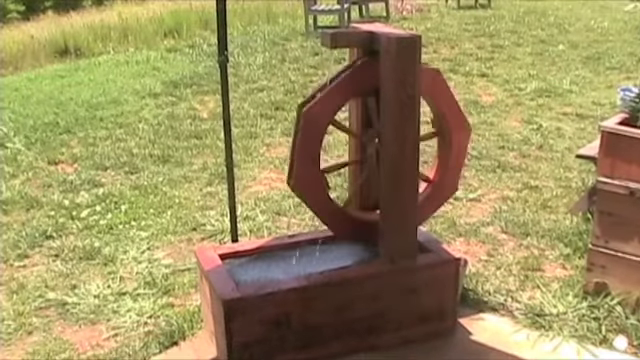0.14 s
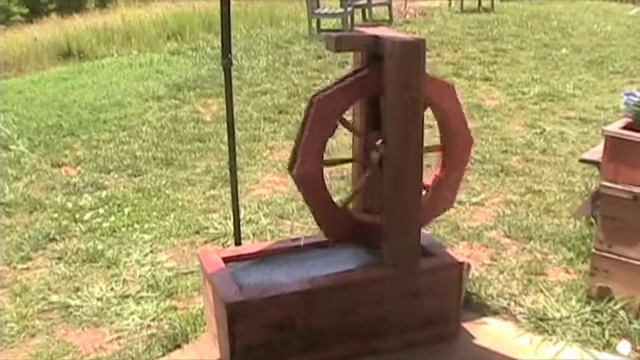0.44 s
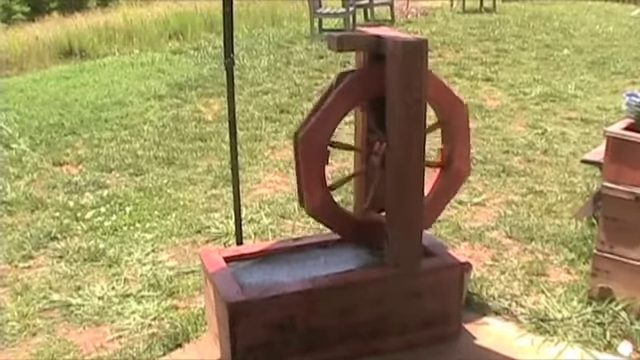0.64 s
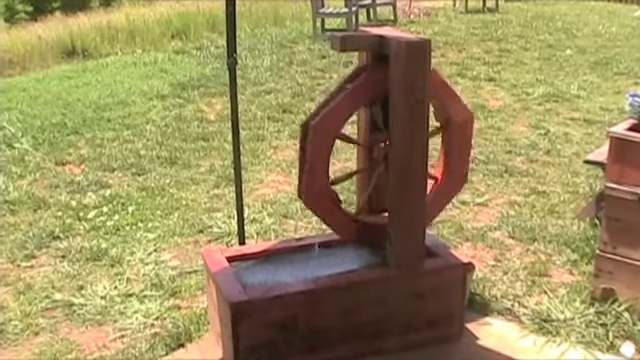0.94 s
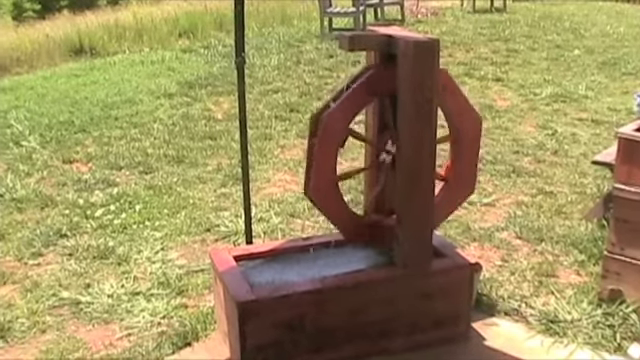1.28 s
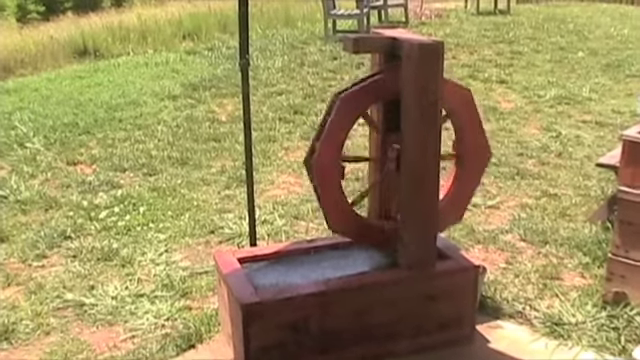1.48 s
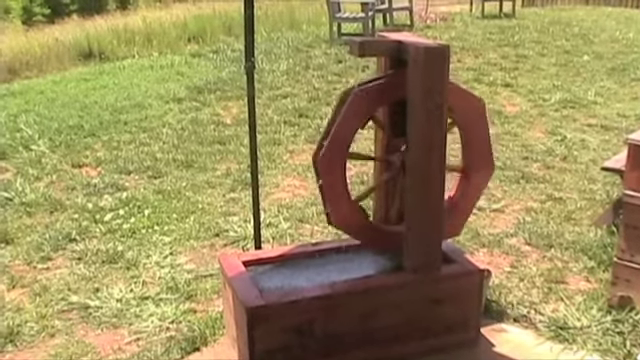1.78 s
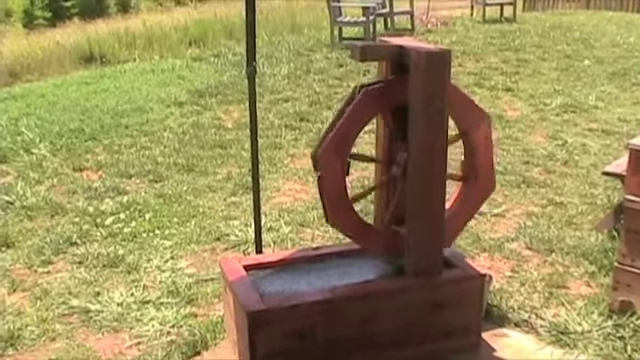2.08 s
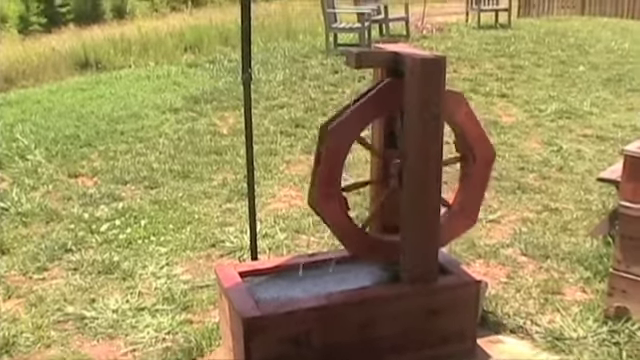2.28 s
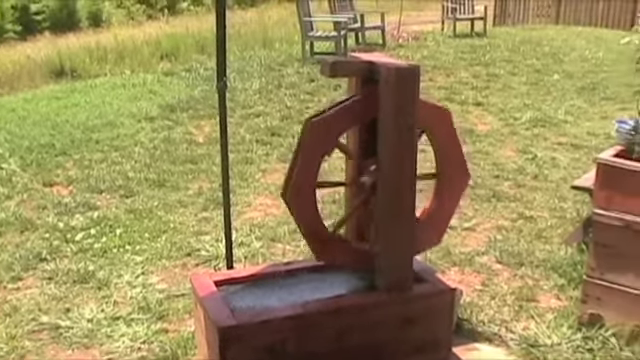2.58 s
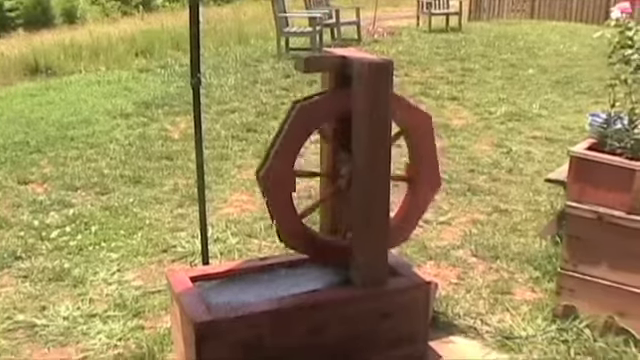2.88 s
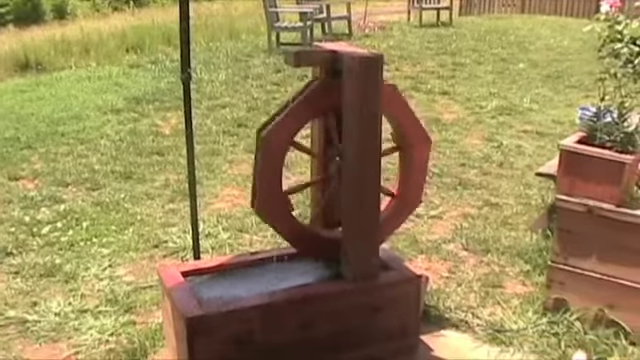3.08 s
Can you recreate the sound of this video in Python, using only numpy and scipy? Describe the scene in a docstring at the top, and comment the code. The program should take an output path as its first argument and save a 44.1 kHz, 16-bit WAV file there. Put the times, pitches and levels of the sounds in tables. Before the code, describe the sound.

Small wooden water wheel drips and splashes steadily into its trough outdoors, with a low motor hum

```python
"""In a garden, a small wooden water wheel: each paddle tips a splash of drops into the trough.
The splashes and a steady trickle are tiny rising bubbles over fine spray; louder drops are fluttering tones.
Wood knocks once and rebounds twice, as decaying modes. A pump motor hums in sines inside a low noise rush.
Wind buffets the two microphone ports in opposite phase as band noise and pops, then drops."""
import sys
import numpy as np
from scipy import signal
from scipy.fft import rfft, irfft, next_fast_len
from scipy.io import wavfile
from scipy.ndimage import uniform_filter1d

SR = 44100
rng = np.random.default_rng(int(sys.argv[2]) if len(sys.argv) > 2 else 0)


def generate_wav(signal):
    """Clip the signal to [-1, 1] and save it as 16-bit WAV at the path in sys.argv[1]."""
    frames = np.transpose(np.atleast_2d(signal))
    scaled = np.clip(frames, -1, 1) * 32767
    pcm = np.round(scaled).astype(np.int16)
    wavfile.write(sys.argv[1], SR, pcm)


N = 142443  # length in samples
NARROW_S = 2.1  # from here the low left-right sound is narrower

# Colour of the rush's left-right part before the narrowing. Each row: frequency in Hz, relative level in dB per Hz.
WIDE_COLOUR = [(100, -15), (256, -6.5), (500, -9.5), (800, -10.5), (1220, -13.5), (2140, -22), (5000, -27),
               (9000, -44), (12500, -30), (14500, -52)]
# The same part after the narrowing. Each row: frequency in Hz, relative level in dB per Hz.
NARROWED_COLOUR = [(100, -15), (270, -32), (500, -24), (900, -19.5), (1300, -18.5), (2140, -24),
                   (5000, -27), (9000, -46), (12500, -33), (14500, -48)]


def amp(db):
    """Gain for a level in dB."""
    return 10 ** (np.asarray(db, float) / 20)


def evened(x):
    """Scales to rms 1."""
    return x / np.sqrt(np.mean(x ** 2) + 1e-20)


def read(points, hz):
    """Reads a spectrum on a log-frequency axis."""
    point_hz, value = np.transpose(points)
    return np.interp(np.log(hz + 1), np.log(point_hz + 1), value)


def add(mix, start_s, sound):
    """Mixes a sound in at its start time."""
    part = mix[round(start_s * SR):][:len(sound)]
    part += sound[:len(part)]


def noise(colour_db, patchy_db, size):
    """Noise of rms 1 from random short-time spectra with drifting patches; colour_db(hz, t) shapes it."""
    frames = 4 * N // size + 5
    hz = np.fft.rfftfreq(size, 1 / SR)[:, None]
    real, imag, patch = rng.standard_normal((frames, len(hz), 3)).T
    patch = uniform_filter1d(patch, size=6, axis=0)  # across frequency
    patch = evened(uniform_filter1d(patch, size=8, axis=1))  # across time
    t = np.arange(frames) * size / 4 / SR
    spectra = (real + 1j * imag) * amp(colour_db(hz, t) + patchy_db * patch)
    return evened(signal.istft(spectra, nperseg=size, noverlap=3 * size // 4)[1][:N])


def slow(rate_hz):
    """Slow random drift of rms 1."""
    hz = np.fft.rfftfreq(N, 1 / SR)
    return evened(irfft(rfft(rng.standard_normal(N)) / (1 + (hz / rate_hz) ** 2), N))


def low_cut(x):
    """Steep 90 Hz high-pass that rings briefly on a blow."""
    return signal.sosfilt(signal.cheby1(3, 2, 90, "high", fs=SR, output="sos"), x)


def rush():
    """Broad low noise as centre and left-right parts; its bass eases off and narrows suddenly."""
    # Colour of the centre. Each row: frequency in Hz, relative level in dB per Hz.
    centre_colour = [(18, -50), (30, -9.5), (91, -8.5), (166, -8.5), (234, 0), (426, 1), (475, 1),
                     (654, -4.5), (777, -3.5), (1220, -7), (1330, -8), (1680, -9.5), (5000, -25.5),
                     (6500, -27.5), (11000, -120)]
    # Course of the centre; the first level sets the overall rms, the others count relative to it.
    # Each row: time in seconds, level in dB, extra bass in dB.
    level_course = [(0, -35.5, 1.5), (.8, -37, 1.4), (1.2, -36, 2.5), (1.5, -36, -0.2), (1.95, -36, 2),
                    (2.2, -37.5, -4), (2.4, -37, -1.5), (3.23, -35.5, -5)]
    bass_top_hz, wide_db, lean_left = 554, -46.5, 0.067
    s, level_db, bass_db = np.transpose(level_course)

    def centre_db(hz, t):
        bass = np.interp(t, s, bass_db) / (1 + (hz / bass_top_hz) ** 4)
        return read(centre_colour, hz) + bass + np.interp(t, s, level_db - level_db[0])

    def side_db(hz, t):
        return np.where(t < NARROW_S, read(WIDE_COLOUR, hz), read(NARROWED_COLOUR, hz))

    centre = amp(level_db[0]) * noise(centre_db, patchy_db=1.0, size=2048)
    side = amp(wide_db) * noise(side_db, patchy_db=0.0, size=1024)
    before = np.arange(N) < NARROW_S * SR  # the lean ends at the narrowing
    return np.array([centre, side + lean_left * before * centre])


def motor():
    """Sines at multiples of the shaft speed waver and fade; two low drones wander in level and pitch."""
    # The motor's hum. Each row: multiple of shaft speed, centre level in dB, left-right level
    # before the narrowing in dB.
    hum_orders = [(7, -49.5, -60), (8, -46, -64), (9, -57, -66), (12, -55.5, -67), (13, -52, -61),
                  (15, -62, -62), (22, -47, -63), (23, -57, -67)]
    # Low drones in the centre. Each row: frequency in Hz, level in dB, start of the fade in seconds.
    low_drones = [(83, -50.5, 1.4), (122, -50.5, 1.8)]
    shaft_hz, waver_db, drone_fade_db_per_s = 59.18, 1.2, 6.5
    hum_fade_db_per_s = 0.06  # times the multiple: high orders fade faster
    t, out = np.arange(N) / SR, np.zeros((2, N))
    for k, centre_db, side_db in hum_orders:
        hz = k * shaft_hz
        turn = 2 * np.pi * (hz * t + rng.random())
        narrowing_db = read(NARROWED_COLOUR, hz) - read(WIDE_COLOUR, hz)
        side_db = side_db + (t > NARROW_S) * narrowing_db
        gain = np.sqrt(2) * amp(waver_db * slow(3.2) - hum_fade_db_per_s * k * t)
        out += gain * np.array([amp(centre_db) * np.sin(turn), amp(side_db) * np.cos(turn)])
    for hz, db, fade_s in low_drones:
        db = db - drone_fade_db_per_s * np.maximum(t - fade_s, 0)
        gain = np.sqrt(2) * amp(db + 1.4 * slow(1.8))
        cycles = np.cumsum(hz + 0.81 * slow(2.5)) / SR
        out[0] += gain * np.sin(2 * np.pi * cycles)
    return out


def buffet(band_hz):
    """Band noise with its own swells evened out."""
    band = signal.butter(2, band_hz, "band", fs=SR, output="sos")
    x = signal.sosfilt(band, rng.standard_normal(N))
    envelope = abs(signal.hilbert(x, next_fast_len(N))[:N])
    return evened(x / uniform_filter1d(envelope, 700))


def wind():
    """Thuds and flutter follow the gusts, mostly in opposite phase at the two ports; a few sharp pops."""
    # Gusts on the ports. Each row: time in seconds, thud level in dB, flutter relative to the thud in dB.
    gust_course = [(0.0, -45, -3), (0.339, -39, -6), (0.509, -40, -9), (0.564, -45, 3), (0.589, -29, -25),
                   (0.614, -40, -17), (0.634, -20, -16), (0.663, -36, -14), (0.758, -33, -21),
                   (0.958, -50.5, 6), (0.983, -38, -10), (1.147, -49.5, 5), (1.167, -32, -9),
                   (1.222, -36, -23), (1.247, -27, -32), (1.342, -52, 6), (1.367, -43, -2),
                   (1.541, -34, -16), (1.651, -42.5, 5.5), (1.726, -24.5, -18), (1.774, -28, -29),
                   (1.836, -23, -25), (1.861, -34, -24), (1.896, -16, -37), (1.931, -36, -12),
                   (1.961, -12, -19), (1.995, -37, -30), (2.02, -30, -8), (2.085, -50, -10),
                   (2.14, -29, -5), (2.175, -31, 1), (2.24, -27, -6), (2.263, -36, 2), (2.305, -58, -3),
                   (2.594, -44.5, -0.5), (2.859, -63, -27), (3.063, -73, 6), (3.088, -48.5, -9),
                   (3.198, -48, -25), (3.228, -66, -7)]
    # Sharp pops. Each row: time in seconds, signed size, width in seconds, factor of the filtered centre copy.
    wind_pops = [(1.894, -.12, .004, 0.01), (1.959, -.26, .0028, 0.01), (2.137, .12, .002, .4),
                 (2.157, -.09, .002, .6), (2.193, .17, .0016, .5), (2.23, -.16, .0018, .55),
                 (2.2415, -.22, .0024, 0)  , (2.2625, .4, .001, -.95), (2.583, .01, .002, 5),
                 (2.6085, .012, .0025, 6), (2.62, .01, .003, 4)]
    thud_hz, flutter_hz = (38.2, 83), (87, 238)
    thud_leak_db, flutter_leak_db = -42, -10  # into the centre
    t = np.arange(N) / SR
    s, thud_db, flutter_db = np.transpose(gust_course)
    thud = amp(np.interp(t, s, thud_db)) * buffet(thud_hz)
    flutter_gain = amp(np.interp(t, s, thud_db + flutter_db))
    centre = amp(thud_leak_db) * thud + amp(flutter_leak_db) * flutter_gain * buffet(flutter_hz)
    side = thud + flutter_gain * buffet(flutter_hz)
    for at, size, width, centre_factor in wind_pops:
        u = (t - at) / width
        pop = size * (np.exp(-u ** 2) - .3 * np.exp(-(u / 3.3) ** 2))  # a bump in a wider, opposite one
        centre += centre_factor * low_cut(uniform_filter1d(pop, size=130))
        side += pop
    return np.array([centre, side])


def knock():
    """Struck wood rings in decaying modes, then rebounds twice: brighter, then duller."""
    # Blows. Each row: time in seconds, peak level before the low cut in dB, tilt above the lowest mode
    # in dB per octave.
    wood_blows = [(2.8921, -14, 0), (2.895, -21, 3), (2.9024, -24, -8)]
    # Modes of the wood. Each row: frequency in Hz, relative level in dB, time to fall by 60 dB in seconds.
    wood_modes = [(520, 3, .016), (740, 12, .022), (960, 9, .012), (1450, 7, .008), (2200, 5, .009),
                  (3200, 2, .011)]
    out, t = np.zeros(N), np.arange(3000) / SR
    for start, db, tilt_db in wood_blows:
        ring = np.zeros(len(t))
        for hz, top_db, t60 in wood_modes:
            mode_db = top_db + tilt_db * np.log2(hz / wood_modes[0][0]) - 60 * t / t60
            ring += amp(mode_db) * np.sin(2 * np.pi * hz * t)
        add(out, start, amp(db) * ring / abs(ring).max())
    return low_cut(out)


def drops():
    """Each loud drop is a short, fluttering, slightly rising tone."""
    # Loud single drops. Each row: start in seconds, pitch in Hz, level before the flutter in dB,
    # decay length in seconds.
    loud_drops = [(0.269, 9250, -39, 0.014), (0.274, 11100, -35, 0.017), (0.317, 8790, -40, 0.008),
                  (0.318, 10600, -42, 0.036), (0.351, 2620, -39.5, 0.03), (0.413, 2370, -38.5, 0.0076),
                  (0.655, 10300, -38, 0.007), (0.659, 8550, -35.5, 0.013), (0.686, 7920, -44.5, 0.022),
                  (0.689, 2080, -40, 0.017), (0.723, 5510, -46, 0.02), (0.725, 8500, -42, 0.009),
                  (1.022, 10000, -39, 0.0095), (1.023, 6670, -40, 0.009), (1.039, 6650, -47, 0.033),
                  (1.04, 6040, -33.5, 0.014), (1.055, 6230, -43, 0.012), (1.09, 4550, -39, 0.009),
                  (1.108, 5300, -43, 0.022), (1.13, 5900, -42, 0.011), (1.158, 8650, -40, 0.0089),
                  (1.386, 10800, -40, 0.018), (1.424, 7430, -38, 0.0093), (1.824, 2574, -35, 0.022),
                  (1.834, 3870, -43, 0.014), (1.861, 8060, -38.5, 0.0085), (1.988, 4290, -39.5, 0.017),
                  (2.415, 10800, -40, 0.02), (2.442, 5680, -42.5, 0.015), (2.464, 4770, -41, 0.0073),
                  (2.771, 7330, -39.5, 0.0079), (2.775, 9760, -35.5, 0.017), (2.791, 6720, -41, 0.007),
                  (2.792, 3750, -38.5, 0.022), (2.851, 4950, -42.5, 0.017), (2.861, 2380, -40, 0.0092),
                  (2.865, 8000, -46, 0.007), (2.905, 10400, -39, 0.011), (3.166, 8200, -42, 0.023),
                  (3.167, 10000, -39, 0.008), (3.202, 5640, -41, 0.013), (3.223, 6500, -37, 0.007)]
    glide = .015  # rise of pitch over one length, as a share
    rough, flutter_cycles = 1.5, 5  # flutter against the steady tone; its smoothing in cycles
    out, draws = np.zeros(N), rng.standard_normal((len(loud_drops), 2, 2000))
    for (start, hz, db, length), pair in zip(loud_drops, draws):
        t = np.arange(pair.shape[1]) / SR
        a, b = (evened(uniform_filter1d(v, int(flutter_cycles * SR / hz))) for v in pair)
        flutter = (1 + rough * (a + 1j * b)) / np.hypot(1, rough)
        cycles = hz * t * (1 + glide * (t / length - 1) / 2)
        tone = (flutter * np.exp(2j * np.pi * cycles)).real
        envelope = np.minimum(t / 0.0002, 1) * np.exp(-(t / length) ** 1.34)
        add(out, start, amp(db) * tone * envelope)
    return out


def flow():
    """Gain of the falling water: a trickle plus a sudden, clumpy burst per paddle that swells a little."""
    # Paddle splashes. Each row: start in seconds, level before swell and clumps in dB, length in seconds.
    paddle_splashes = [(0.237, -45, 0.084), (0.64, -44, 0.082), (0.96, -50.5, .02), (1.018, -43, 0.087),
                       (1.204, -50, 0.016), (1.372, -44, 0.037), (1.755, -45.5, 0.066), (2.072, -45, 0.062),
                       (2.397, -43.5, 0.064), (2.764, -45.5, 0.11), (3.082, -49.5, 0.073), (3.175, -44, .1)]
    trickle_db, swell_db, clump_db = -48.5, 1, 1.47
    rise_s, tail_s = 0.0031, 0.068
    t, power = np.arange(N) / SR, amp(2 * trickle_db)
    clumps = amp(clump_db * slow(45.0))
    for start, db, length in paddle_splashes:
        u = t - start
        shape = np.clip(u / rise_s, 0, 1) * np.exp(-np.maximum(u - length, 0) / tail_s)
        level = amp(db + swell_db * np.clip(u / length, 0, 1))
        power = power + (shape * clumps * level) ** 2
    return np.sqrt(power)


def patter():
    """Thousands of tiny rising bubbles, struck at random moments, over fine spray."""
    # Colour of falling water. Each row: frequency in Hz, relative level in dB per Hz.
    water_colour = [(1000, -12), (2000, 3.5), (3200, -2), (5000, 1), (7000, -0.5), (9000, -1),
                    (11000, -7.5), (12500, -12), (13500, -32), (14500, -34)]
    grains_per_s, decay_cycles = 5000, 2.05
    spray_db = 2.5  # against the bubbles
    hits = 1.0 * (rng.random(N) < grains_per_s / SR)
    pitches = np.geomspace(1200, 13500, 80)  # Hz
    kind, bubbles = rng.integers(0, len(pitches), N), np.zeros(N)
    for k, hz in enumerate(pitches):
        c = np.arange(0, 4 * decay_cycles, hz / SR)  # time in cycles
        grain = np.sin(2 * np.pi * c * (1 + 0.0053 * c)) * np.exp(-c / decay_cycles) * np.minimum(c, 1)
        grain = grain * hz * amp(read(water_colour, hz))
        bubbles += signal.oaconvolve(hits * (kind == k), grain)[:N]
    spray = noise(lambda hz, t: read(water_colour, hz), patchy_db=3.0, size=256)
    return evened(evened(bubbles) + amp(spray_db) * spray)


def wheel():
    """The wheel stands to the right: the left port hears it a moment later; part of the patter is diffuse."""
    left_lag_s, right_db, diffuse_db = .00004, 1, -4.5
    gain = flow()
    direct = gain * patter() + drops() + knock()
    hz = np.fft.rfftfreq(N, 1 / SR)
    late = irfft(rfft(direct) * np.exp(-2j * np.pi * hz * left_lag_s), N)
    diffuse = uniform_filter1d(gain, 600) * np.array([patter(), patter()])
    return np.array([late, amp(right_db) * direct]) + amp(diffuse_db) * diffuse


def scene():
    """Rush, motor, wind and wheel as left and right."""
    centre, side = rush() + motor() + wind()
    return wheel() + np.array([centre + side, centre - side])


def record(dry):
    """Band limits, lower for the centre than for the left-right part."""
    centre_edge_hz, side_edge_hz = 11250, 14300

    def limited(x, edge_hz):
        return signal.oaconvolve(x, signal.firwin(511, edge_hz, window=("kaiser", 9), fs=SR), "same")

    centre = limited((dry[0] + dry[1]) / 2, centre_edge_hz)
    side = limited((dry[0] - dry[1]) / 2, side_edge_hz)
    return np.array([centre + side, centre - side])


dry = scene()
out = record(dry)
generate_wav(out)
```